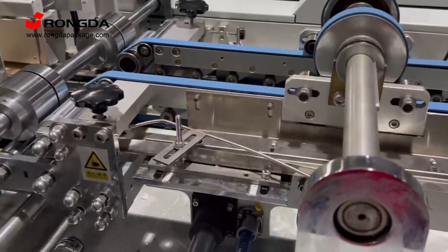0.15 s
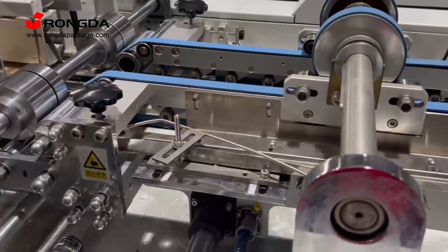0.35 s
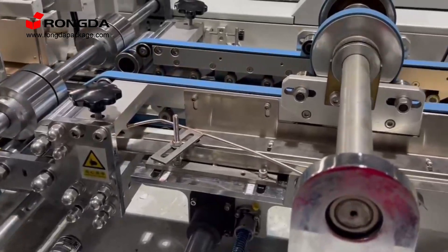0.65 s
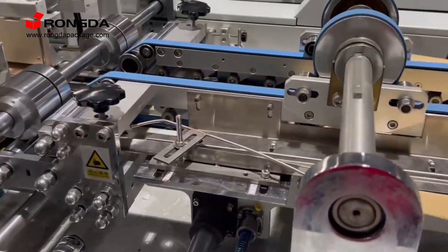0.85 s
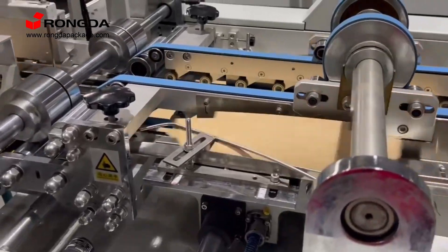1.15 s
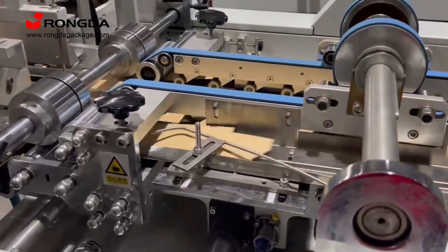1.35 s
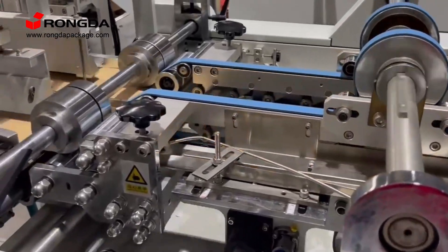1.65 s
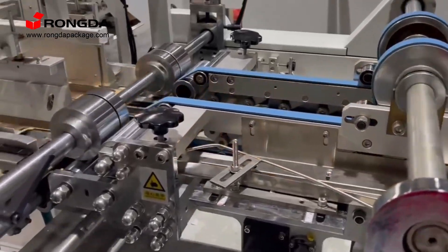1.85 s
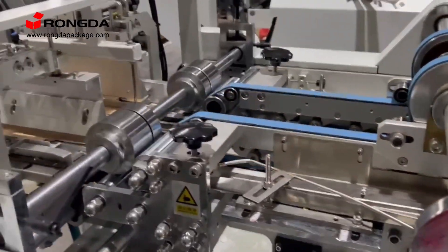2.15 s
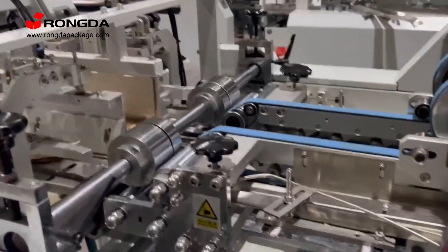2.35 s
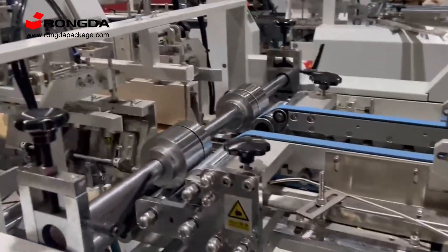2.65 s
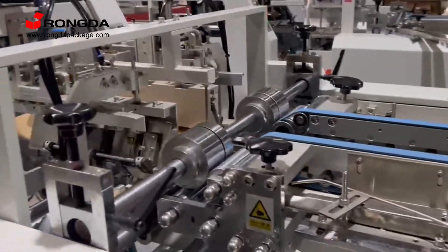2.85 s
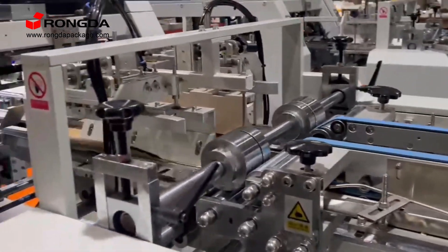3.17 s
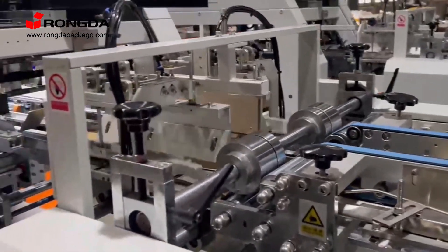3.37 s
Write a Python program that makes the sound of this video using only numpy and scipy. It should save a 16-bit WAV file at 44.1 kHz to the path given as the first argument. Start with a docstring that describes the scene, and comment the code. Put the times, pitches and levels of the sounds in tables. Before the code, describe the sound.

A box folding machine runs steadily in a large factory hall, captured close in stereo: motor hum, belt whir and rattle under irregular cardboard slaps, scrapes, dull knocks and bright spits of air.

```python
"""Large factory hall, two microphone ports close to a box folding machine with a 2.4 s cycle.
Near: folding arms slap and scrape the cardboard (noise bursts and ticks ringing sheet modes), air valves
spit, blow and leak (shaped noise, ringing valve bodies), cylinders and boards hit the frame (dying sines).
Behind: motor hum (narrow noise bands), rattling parts (random clicks ringing many pitches), and
belts, rumble and hall hiss (coloured, fluttering noise)."""
import sys
import numpy as np
from scipy import signal
from scipy.fft import rfft, irfft
from scipy.io import wavfile

SR = 44100
rng = np.random.default_rng(int(sys.argv[2]) if len(sys.argv) > 2 else 0)


def dump_mix(stems):
    """Bounce the given channels to the path in sys.argv[1] as a 16-bit WAV at rate SR."""
    frames = np.atleast_2d(stems).T  # one column per channel
    limited = np.clip(frames, -1, 1)  # hard clip at full scale
    pcm = np.round(limited * 32767).astype(np.int16)
    wavfile.write(sys.argv[1], SR, pcm)


N = 154791  # samples, about 3.5 s
TIME = np.arange(N) / SR
HZ = np.maximum(np.fft.rfftfreq(N, 1 / SR), 1)

# Source levels below hold ahead of the stereo image.
# Relative noise spectra of hall, frame rumble and belts: [f/Hz, level/dB per Hz]
HALL_HISS_SPECTRUM = [(1500, -28), (3000, 13.5), (5500, 4.5), (8000, 9), (15650, 0), (15950, -40)]
RUMBLE_SPECTRUM = [(25, -51), (45, -12), (65, -8.5), (100, -6.5), (150, -5), (210, -0.5), (300, -3.5),
                   (420, -10.5), (600, -35.5)]
BELT_SPECTRUM = [(250, -46), (420, 2), (640, 2.5), (900, -1), (1300, -2), (2000, -6), (3000, -13),
                 (5000, -18), (8000, -30.5)]
# Shaking of the frame, heard as rumble: [t/s, level/dB]
FRAME_SHAKE = [(0.0, -26), (0.12, -20.5), (0.22, -20.5), (0.53, -28), (0.81, -22), (1.14, -26.5),
               (1.55, -24.5), (2.01, -29), (2.16, -29), (2.52, -23), (2.86, -28), (2.99, -25.5),
               (3.25, -21), (3.4, -26), (3.51, -22.5)]
# Load on belts and rollers, steering belts and rattle: [t/s, relative level/dB]
MACHINE_LOAD = [(0.0, -25.5), (0.15, -27), (0.4, -31), (0.61, -31), (0.84, -28), (1.19, -31), (1.67, -30.5),
                (2.09, -31.5), (2.5, -27), (2.83, -30.5), (3.0, -30.5), (3.25, -27), (3.51, -28.5)]
# Motor and gear tones: [f/Hz, rms level/dB, half width at half amplitude/Hz]
MOTOR_TONES = [(72, -38, 7.9), (102, -34.5, 3.3), (148, -49, 14), (200.1, -33.5, 24), (394.8, -36, 4.9),
               (553.5, -45.5, 6.1), (633, -40.5, 27), (783, -43, 30), (1140, -51, 15), (1431, -40, 38),
               (1705, -45, 35)]
# Cylinders reach their stops and the frame booms: [t/s, peak level/dB, f/Hz, t60/s]
CYLINDER_THUMPS = [(0.15, -18.5, 141.7, 0.28), (0.281, -21.5, 397, 0.076), (0.699, -16, 102, 0.58),
                   (0.717, -23.5, 187, 0.58), (0.822, -23, 69, 0.15), (0.961, -23, 111, 0.19),
                   (1.519, -21, 70.4, 0.3), (1.55, -18.5, 216.5, 0.11), (1.63, -25, 208, 0.26),
                   (1.798, -26.5, 69.4, 0.24), (2.24, -26, 63.4, 0.12), (2.521, -32, 247, 0.14),
                   (2.521, -23.5, 310, 0.11), (2.55, -19, 137.4, 0.41), (3.171, -25, 257, 0.092),
                   (3.202, -25.5, 218.5, 0.57), (3.309, -29, 95.5, 0.55)]
# Dull single knocks of board on metal: [t/s, peak level/dB, f/Hz]
BOARD_KNOCKS = [(.608, -17, 277), (.659, -13.5, 200), (1.329, -14, 231), (1.654, -13, 202),
                (1.706, -14, 261), (2.445, -16, 345), (3.058, -15, 330), (3.221, -11, 205),
                (3.394, -9, 420)]
# Valves open with a short bright spit: [t/s, nominal peak level ahead of the nozzles/dB, t60/s]
VALVE_SPITS = [(0.4915, -12, 0.12), (0.6593, -10.5, 0.05), (0.7923, -8.5, 0.05), (0.844, -10, 0.026),
               (1.0433, -9.5, 0.049), (1.053, -4.5, 0.05), (1.285, -15.5, 0.059), (1.3584, -12.5, 0.059),
               (1.6841, -24, 0.05), (1.7589, -19, 0.05), (1.824, -12, 0.034), (2.194, -17.5, 0.071),
               (2.2517, -14, 0.064), (2.8895, -9.5, 0.034), (3.058, -10.5, 0.11), (3.191, -8, 0.038),
               (3.4393, -22, 0.017), (3.4501, -6.5, 0.048)]
# Air blows after valve spits, and a weaker steady leak hisses between 1.1 and 2.1 s:
# [t/s, level ahead of the nozzles/dB, hold/s, t60/s]
AIR_BLOWS_AND_LEAK = [(0.0, -30.5, 0.06, 0.37), (.135, -28, 0.03, 0.12), (.234, -26, 0.027, 0.33),
                      (.492, -28.5, 0.022, 0.39), (.63, -29, 0.024, .2), (.657, -25, .05, .3),
                      (.71, -23.5, 0.063, 0.38), (.785, -26, 0.061, 0.49), (1.045, -29.5, 0.014, 1),
                      (1.1, -33.5, 0.21, 0.45), (1.28, -34.5, 0.041, 0.99), (1.36, -30, 0.06, 0.19),
                      (1.45, -33, 0.16, .4), (1.62, -31, 0.16, 0.26), (1.82, -35, 0.087, 1),
                      (1.9, -35.5, 0.48, 0.54), (2.197, -23.5, 0.075, 0.28), (2.30, -26, 0.097, 0.64),
                      (2.529, -27.5, 0.022, 0.12), (2.628, -26, 0.045, 0.17), (2.889, -32, 0.023, 0.81),
                      (3.04, -23.5, 0.12, 0.99), (3.185, -24, 0.079, 0.17), (3.44, -17, 0.012, 0.14)]
# Relative noise spectra of spit and steadier jet: [f/Hz, level/dB per Hz]
SPIT_SPECTRUM = [(1500, -30), (3500, -9), (5600, -6.5), (7500, 3.5), (10000, 10), (15650, 4), (16000, -25)]
JET_SPECTRUM = [(600, 10), (1500, 7), (3000, 3.5), (4500, 5.5), (5600, 3), (7500, 4.5), (10000, 6.5),
                (15650, 1), (15950, -35)]
# The valve body rings at each spit: [f/Hz, relative level/dB, t60/s]
VALVE_MODES = [(5890, 0.5, .045), (6300, -6, .04), (7100, -1.5, 0.042), (7480, -1.5, 0.053),
               (8200, 4, 0.044)]
# Valve bodies and nozzles colour the air: [f/Hz, width/Hz, gain of the resonance alone/dB]
NOZZLE_RESONANCES = [(2630, 67, 7.5), (3520, 24, 0), (4380, 27, 7), (4900, 54, 6.5), (6200, 49, 1.5),
                     (6790, 77, 1), (7600, 56, 1.5), (8200, 72, -3.5), (13000, 42, 3), (12651, 30, 7)]
# Top treble of the valves as the microphone turns towards them, and its later fall: [t/s, level/dB]
MICROPHONE_TURN = [(0.0, -5), (1.398, -5), (2.2, -0.5), (3.51, -6.5)]
# Arms and guides slap the cardboard, and low scrapes near 800 Hz rub along it:
# [t/s, nominal peak level/dB, t60/s, centre of colour f/Hz]
CARDBOARD_SLAPS_AND_SCRAPES = [(0.006, -11.5, 0.09, 2650), (0.026, -18, 0.082, 2680), (.03, -19, 0.21, 900),
                               (.135, -16.5, 0.076, 2510), (0.175, -11.5, 0.05, 1600),
                               (.236, -39, 0.16, 3860), (.274, -20, .07, 4200), (0.29, -11.5, 0.25, 660),
                               (0.35, -18.5, 0.12, 1900), (0.501, -23, 0.17, 3000), (.63, -16.5, .15, 1200),
                               (.659, -13, 0.53, 754), (0.675, -20, 0.11, 1800), (0.714, -22, .1, 2800),
                               (.76, -25, 0.17, 890), (.81, -16, 0.17, 980), (0.758, -23, 0.066, 1900),
                               (0.713, -27, 0.18, 880), (0.786, -14.5, 0.13, 3680),
                               (0.797, -14.5, 0.13, 2240), (0.854, -19.5, 0.18, 2600),
                               (0.901, -23, .08, 2600), (.994, -21, 0.24, 2250), (1.052, -1.5, .035, 3300),
                               (1.0525, -7, .045, 2300), (1.0605, -12, 0.04, 2270), (1.064, -15, .04, 4200),
                               (1.082, -18.5, 0.11, 3020), (1.089, -17, 0.085, 800),
                               (1.288, -12.5, 0.1, 1350), (1.419, -18, 0.068, 2390),
                               (1.649, -19.5, 0.064, 2530), (1.684, -16, 0.04, 4930),
                               (1.709, -10, 0.066, 690), (2.2, -23, .1, 4560), (2.25, -17, 0.079, 3500),
                               (2.29, -11, 0.19, 730), (2.335, -17.5, 0.067, 4130), (2.373, -13, .05, 2900),
                               (2.377, -12, 0.08, 3000), (2.405, -13, 0.07, 2700), (2.412, -15, .09, 2400),
                               (2.449, -11, 0.048, 1190), (2.531, -17.5, 0.064, 2390),
                               (2.648, -22, 0.11, 2500), (2.677, -12.5, 0.23, 796), (3.06, -19, 0.11, 2600),
                               (3.07, -12.5, .2, 800), (3.085, -24, 0.14, 4900), (3.111, -29, 0.13, 4800),
                               (3.12, -22, 0.17, 850), (3.171, -15, 0.36, 800), (3.176, -14, 0.059, 1900),
                               (3.193, -17, 0.11, 3300), (3.239, -22, 0.082, 1500),
                               (3.4485, -8.5, 0.048, 2930), (3.452, -15.5, 0.087, 3470),
                               (3.453, -15, 0.15, 880), (3.46, -18, 0.056, 2970)]
# Ringing modes of sheet and folding arm: [f/Hz, relative level/dB, t60/s]
SHEET_MODES = [(620, -8, .04), (800, -8, .04), (1180, -6, .05), (1480, -7, .05), (1770, -3, .06),
               (2000, -6, .05), (2266, -1, .065), (2670, -3, .05), (3030, -1, .055), (3370, -1, .045),
               (3700, -1, .045), (4180, -3, .05), (4700, -5, .05), (5280, -5, .05)]
# Stereo image as finally heard, its phase stepping in the treble:
# [f/Hz, likeness 0-1, phase of right ahead of left/rad, left minus right level/dB]
STEREO_IMAGE = [(60, .99, 0.0, 0.0), (200, .92, 0.0, .2), (400, .75, -.2, .5), (700, .4, -.8, 2.5),
                (1050, .2, -1.6, 3), (1500, .35, -3.6, -1), (1680, .4, -4.2, -.5), (1800, .85, -6.4, 2),
                (2500, .8, -6.7, 2.7), (3400, .65, -7.1, 3.5), (4400, .7, -6.5, 2.2), (5400, .3, -6.2, .3),
                (5800, .5, -5.6, -.3), (6500, .985, -6.3, 0), (7400, .985, -6.05, 0), (8200, .9, -5.2, 0),
                (9100, .98, -3.5, 0), (9900, .993, -3.14, 0), (10850, .99, -2.9, 0), (11150, .85, -2, 0),
                (11950, .99, -.3, 0), (12900, .998, 0, 0), (13700, .99, .25, 0), (14300, .9, 1.5, 0),
                (14900, .96, 2.6, 0), (15600, .98, 3.1, 0)]


def from_db(db):
    """Decibels to amplitude gain."""
    return 10 ** (np.asarray(db) / 20)


def rms_one(x):
    """Scale to unit rms."""
    return x / np.sqrt(np.mean(x ** 2) + 1e-20)


def curve(rows):
    """Straight lines between the rows of [t/s, level/dB]."""
    return np.interp(TIME, *np.transpose(rows))


def drift(rate_hz):
    """Slow random wander of rms about 1: twice-smoothed noise, computed every 40 samples."""
    pole = np.exp(-80 * np.pi * rate_hz / SR)
    steps = rng.standard_normal(N // 40 + 2002)
    slow = signal.lfilter([1], [1, -2 * pole, pole * pole], steps)[2000:]  # settled part
    return np.interp(np.arange(N) / 40, np.arange(len(slow)), rms_one(slow))


def noise(spectrum, flutter_db, rate_hz):
    """Two unrelated noises of one colour with a shared flutter; rms 1."""
    hz, db = np.transpose(spectrum)
    colour = from_db(np.interp(np.log(HZ), np.log(hz), db, left=-70, right=-70))
    coloured = irfft(rfft(rng.standard_normal((2, N))) * colour, N)
    return rms_one(coloured * from_db(flutter_db * drift(rate_hz)))


def envelope(rows, attack_s):
    """Rows of [t/s, level/dB, hold/s, t60/s] rise, hold and die away; their powers add."""
    power = np.zeros(N)
    for s, db, hold, t60 in rows:
        start = max(int(s * SR), 0)
        t = np.arange(min(N - start, int((hold + t60) * SR))) / SR
        decay = from_db(db - 60 * np.maximum(t - hold, 0) / t60)
        power[start:start + len(t)] += (np.minimum(t / attack_s, 1) * decay) ** 2
    return np.sqrt(power)


def ring(clicks, hz, t60):
    """A two-pole resonator: a unit click sets a dying sine of starting height 1 ringing."""
    r, w = from_db(-60 / (t60 * SR)), 2 * np.pi * hz / SR
    return signal.lfilter([0, np.sin(w)], [1, -2 * r * np.cos(w), r * r], clicks + 1e-18)


def hall_hiss():
    """The far hall hisses at a steady mean level with a light flutter."""
    return from_db(-38.5) * noise(HALL_HISS_SPECTRUM, flutter_db=2.2, rate_hz=44)


def rumble():
    """Low noise whose level follows the shaking of the frame."""
    return from_db(curve(FRAME_SHAKE)) * noise(RUMBLE_SPECTRUM, flutter_db=1.27, rate_hz=3.9)


def belts():
    """Broad noise of the belts, rising and falling with the load."""
    return from_db(curve(MACHINE_LOAD) + 0.52) * noise(BELT_SPECTRUM, flutter_db=1.4, rate_hz=14.2)


def rattle():
    """Rollers, chains and guards: random small contacts ring many metal parts, in step with the load."""
    parts, low_hz, high_hz, t60_at_1khz = 32, 450.8, 6522, 0.16
    typical_rate = 200 * from_db(3.0 * drift(8.0))  # contacts per second
    contacts = rng.random(N) < typical_rate / SR
    sizes = from_db(4.5 * np.minimum(rng.exponential(1, (2, N)), 4)) * contacts
    pitches = np.geomspace(low_hz, high_hz, parts) * rng.uniform(1.0, 1.03, parts)
    struck_part = rng.integers(0, parts, N)
    rings = np.zeros((2, N))
    for part, hz in enumerate(pitches):
        t60 = t60_at_1khz * (1000 / hz) ** 0.45
        fainter_when_high = (hz / 1000) ** -0.1
        rings += fainter_when_high * ring(sizes * (struck_part == part), hz, t60)
    softened = signal.lfilter([0.25], [1, -0.75], rings)
    return from_db(curve(MACHINE_LOAD) - 8.5) * rms_one(softened)


def hum():
    """Motor and gear tones as narrow bands of noise that swell and fade."""
    total = np.zeros((2, N))
    for hz, db, width in MOTOR_TONES:
        resonance = 1 / (1 + ((HZ - hz) / width) ** 2)
        tone = irfft(rfft(rng.standard_normal((2, N))) * resonance, N)
        waver = from_db(3.0 * drift(3.0))
        total += from_db(db) * rms_one(waver * tone)
    return total


def frame():
    """Thumps swell and ring in one low mode; knocks rise fast and last a few cycles."""
    thump_rise_s, knock_cycles = 0.028, 5.5
    rows = [(*row, thump_rise_s) for row in CYLINDER_THUMPS]
    rows += [(s, db, hz, knock_cycles / hz, 0.2 / hz) for s, db, hz in BOARD_KNOCKS]
    out = np.zeros(N + SR)
    t = np.arange(SR) / SR
    for s, db, hz, t60, rise in rows:
        start = int(s * SR)
        shape = (1 - np.exp(-(t / rise) ** 2)) * from_db(-60 * t / t60)
        out[start:start + SR] += from_db(db) * shape / shape.max() * np.sin(2 * np.pi * hz * t)
    return out[:N] * [[1.4], [0.1]]  # nearly all of it shared by the ports


def valve_body():
    """Each spit clicks the valve body, which rings in a few high modes."""
    under_spit_db, spread_db = -17, 3.0
    times, peaks_db, _ = np.transpose(VALVE_SPITS)
    total = np.zeros(N)
    for hz, level_db, t60 in VALVE_MODES:
        clicks = np.zeros(N)
        uneven_db = rng.normal(0, spread_db, len(times))
        clicks[[int(s * SR) for s in times]] = from_db(peaks_db + under_spit_db + level_db + uneven_db)
        total += ring(clicks, hz, t60)
    return total


def valves():
    """Spits, jets and a leak of air noise; nozzle resonances and the microphone's turn colour them."""
    spit_crest_db, turn_hz = 7, 9200  # peak over rms; the turn acts above this pitch
    spit_rows = [(s, db - spit_crest_db, 0.004, t60) for s, db, t60 in VALVE_SPITS]
    spits = envelope(spit_rows, attack_s=0.001) * noise(SPIT_SPECTRUM, flutter_db=-0.5, rate_hz=450)
    blowing = envelope(AIR_BLOWS_AND_LEAK, attack_s=0.0059)
    air = spits + blowing * noise(JET_SPECTRUM, flutter_db=2.0, rate_hz=8.2)
    air[0] += valve_body()  # shared by the ports
    nozzle = 1
    for hz, width, db in NOZZLE_RESONANCES:
        nozzle = nozzle + (from_db(db) - 1) / (1 + 2j * (HZ - hz) / width)
    air = irfft(rfft(air) * nozzle, N)
    treble = irfft(rfft(air) / (1 + (turn_hz / HZ) ** 4), N)
    return air + treble * (from_db(curve(MICROPHONE_TURN)) - 1)


def slaps_and_scrapes():
    """Each is a noise burst plus a dying run of ticks in the sheet's modes, strongest near its centre."""
    half_width_octaves, ticks_per_s = 0.5, 650
    noise_db, sheet_db = -9.5, -22  # against the nominal peak
    first_tick, rise_share = 2.2, 0.04  # against the spread of later ticks; share of t60
    out, t = np.zeros((2, N)), np.arange(SR // 4) / SR
    ticks = (rng.random((2, N)) < ticks_per_s / SR) * rng.standard_normal((2, N))
    rough = rng.standard_normal((2, N)) * from_db(2.5 * drift(280))
    for s, db, t60, centre in CARDBOARD_SLAPS_AND_SCRAPES:
        start = int(s * SR)
        span = slice(start, min(start + len(t), N))
        age = t[:span.stop - start]
        fade = from_db(db - 60 * age / t60)
        limits = centre * 2 ** np.array([-half_width_octaves, half_width_octaves])
        band = signal.butter(1, limits, "band", fs=SR, output="sos")
        burst = rms_one(signal.sosfilt(np.vstack([band, band]), rough[:, span]))
        burst = burst * np.minimum(age / (rise_share * t60), 1)
        run = ticks[:, span].copy()
        run[:, 0] = first_tick, 0.57 * first_tick
        rings = np.zeros(run.shape)
        for hz, level_db, decay in SHEET_MODES:
            off_centre_db = -7.9 * (np.log2(hz / centre) / half_width_octaves) ** 2
            gain = from_db(level_db + rng.normal(0, 0.43) + off_centre_db)
            rings += gain * ring(run * fade, hz, decay)
        out[:, span] += from_db(noise_db) * fade * burst + from_db(sheet_db) * rings
    return out


def stereo_image(pair):
    """Shared and unshared sound mix by likeness; left and right differ in phase and level."""
    hz, *columns = np.transpose(STEREO_IMAGE)
    alike, phase, balance_db = (np.interp(HZ, hz, column) for column in columns)
    alike = np.clip(alike, 0, 1)
    sign = np.array([[1], [-1]])  # left, right
    shared, own = rfft(pair)
    mix = np.sqrt((1 + alike) / 2) * shared + sign * np.sqrt((1 - alike) / 2) * own
    return irfft(mix * np.exp(-0.5j * sign * phase) * from_db(sign * balance_db / 2), N)


def scene():
    """The hall, the running machine and its strokes in one stereo image."""
    background = hall_hiss() + rumble() + belts() + rattle() + hum()
    return stereo_image(background + frame() + valves() + slaps_and_scrapes())


def band_limit(x):
    """A steep low-pass at the top of the band."""
    return signal.sosfilt(signal.butter(12, 16460, fs=SR, output="sos"), x)


def record(dry):
    """The microphone signal's peaks are rounded softly towards a ceiling."""
    ceiling = 1.1  # of full scale
    mix = ceiling * np.tanh(dry / ceiling)
    return band_limit(mix)


dry = scene()
out = record(dry)
dump_mix(out)
```